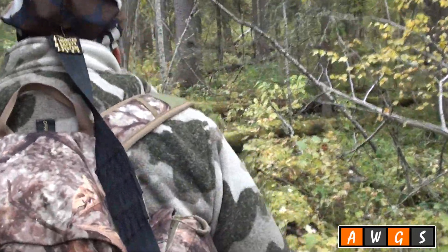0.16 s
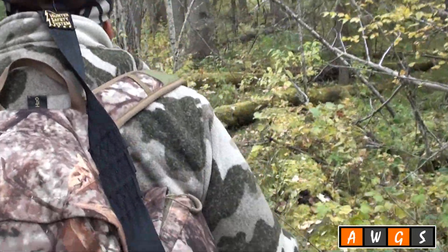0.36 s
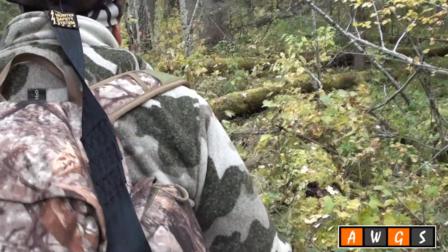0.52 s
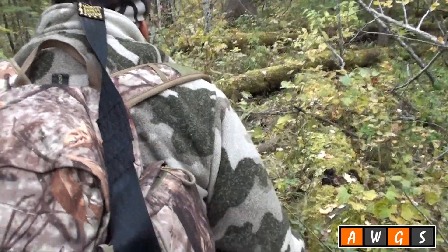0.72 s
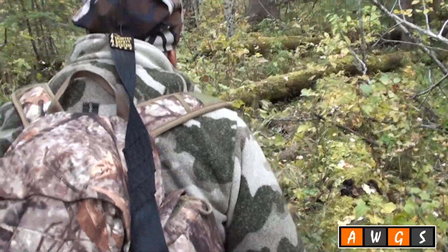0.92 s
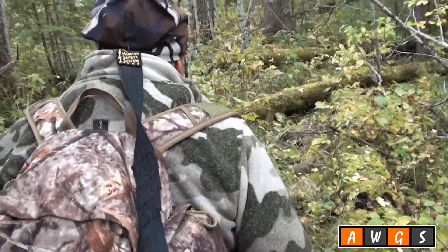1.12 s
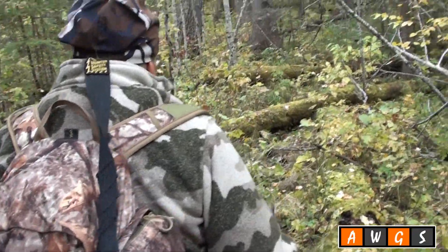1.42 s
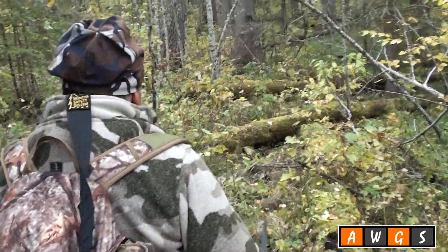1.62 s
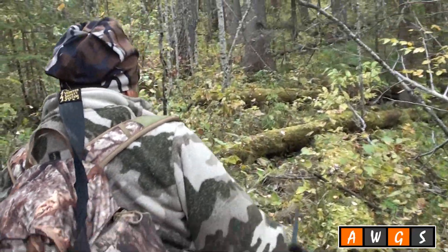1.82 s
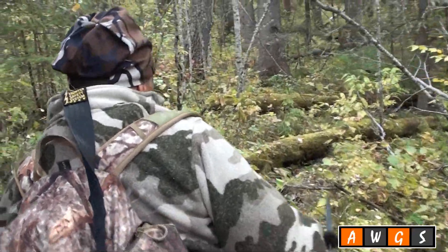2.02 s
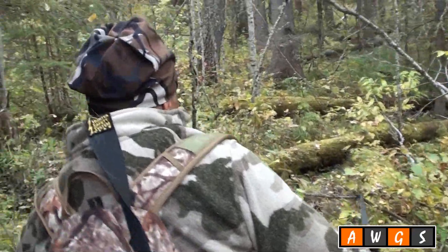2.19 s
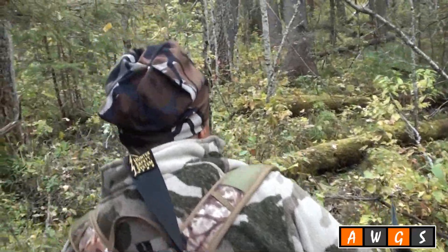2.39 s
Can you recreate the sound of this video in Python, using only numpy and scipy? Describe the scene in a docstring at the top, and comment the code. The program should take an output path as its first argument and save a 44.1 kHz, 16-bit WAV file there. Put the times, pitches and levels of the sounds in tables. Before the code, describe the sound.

Walkers push through dense forest undergrowth: hissing leaves, scraping twigs, rubbing cloth and straps, cracking sticks and soft thuds underfoot. Busiest mid-way, then quieter, with a crisp snap and far knock; close, dry outdoor sound.

```python
"""Forest undergrowth, with walkers pushing through it close to the microphone. Leaves hiss and crackle along
their clothes, twigs scrape and stalks flick the fabric, cloth, strap and pack shell rub: all filtered noise or
random impulses. Sticks crack underfoot and twigs tick high as resonant noise bursts, and one dry twig snaps
close by in brief high modes. Short swinging tones make dull thuds of soil and wood and, at 2.08 s, a distant
wooden knock with its echoes. The trunks answer with a faint noise tail, and a look-ahead limiter catches the
sharpest hits."""
import sys
import numpy as np
from scipy import signal
from scipy.fft import rfft, irfft, next_fast_len
from scipy.io import wavfile
from scipy.ndimage import uniform_filter1d, minimum_filter1d, map_coordinates

SR = 44100
rng = np.random.default_rng(int(sys.argv[2]) if len(sys.argv) > 2 else 0)


def persist_wave(psi):
    """Save psi, clipped to +-1, as 16-bit WAV."""
    counts = np.round(np.clip(psi, -1, 1) * 32767).astype(np.int16)
    wavfile.write(sys.argv[1], SR, np.atleast_2d(counts).T)


N = 112454  # length in samples


def amp(db):
    """Decibels to gain."""
    return 10 ** (np.asarray(db) / 20)


def unit(x):
    """Scale to rms 1."""
    return x / np.sqrt(np.mean(x ** 2) + 1e-20)


def level(rows):
    """Gain for each sample, drawn through rows of seconds and dB."""
    return amp(np.interp(np.arange(N) / SR, *np.transpose(rows)))


def wobble(rate):
    """A smooth random curve with `rate` knots a second."""
    knots = rng.standard_normal(4096)
    return map_coordinates(knots, [np.arange(N) * rate / SR], mode="wrap")


def tone_gain(tone, m):
    """Gain at each bin of an m-point FFT, drawn through rows of Hz and dB on a log frequency axis."""
    hz, db = np.transpose(tone)
    bins = np.fft.rfftfreq(m, 1 / SR)
    return amp(np.interp(np.log(bins + 1), np.log(hz), db))


def colour(x, tone):
    """Minimum-phase filter of unit power: folding the cepstrum makes the response causal."""
    m = 2 * next_fast_len(x.shape[-1])
    cepstrum = irfft(np.log(unit(tone_gain(tone, m))))
    cepstrum[1:m // 2] *= 2
    cepstrum[m // 2 + 1:] = 0
    response = np.exp(rfft(cepstrum))
    return irfft(rfft(x, m) * response, m)[..., :x.shape[-1]]


# How far the stereo side lies under the middle. Each row: frequency in Hz, side gain in dB.
SIDE_TONE = [(60, -20), (200, -21), (600, -14.5), (5500, -19), (10000, -28), (14000, -52)]


def stereo(pair):
    """Left and right from a middle signal and a second one, weakened by frequency into the side."""
    m = next_fast_len(N + 8192)
    middle = pair[0]
    side = irfft(rfft(pair[1], m) * tone_gain(SIDE_TONE, m), m)[:N]
    return np.array([middle + side, middle - side])


def add(track, s, sound):
    """Mix a sound in at s seconds, cut off at the end of the track."""
    i = round(s * SR)
    track[..., i:i + sound.shape[-1]] += sound[..., :max(N - i, 0)]


def grains(rate, spread_db):
    """Two impulse trains with shared random times and log-normal sizes, but separate random signs."""
    # dividing by the root of the rate keeps the power even as the rate changes
    hit = (rng.random(N) < rate / SR) / np.sqrt(np.minimum(rate, SR))
    size = amp(spread_db * np.clip(rng.standard_normal(N), -2.3, 2.3))
    return unit(hit * size * rng.choice([-1, 1], (2, N)))


# Push of the leaves along the clothes. Each row: time in seconds, relative level in dB.
LEAF_PUSH = [(0, -39), (.1, -32.5), (.22, -27.5), (.275, -36), (.38, -26), (.435, -23.5), (.46, -32.5),
             (.57, -24), (.66, -31), (.8, -25.5), (.92, -30.5), (.995, -36.5), (1.03, -22), (1.065, -16),
             (1.17, -17.5), (1.27, -20.5), (1.315, -17), (1.38, -26), (1.47, -28.5), (1.54, -36.5),
             (1.75, -30), (1.8, -35.5), (1.88, -32), (2.0, -31), (2.04, -36), (2.27, -35), (2.31, -38),
             (2.41, -33.5), (2.45, -36.5), (2.55, -36.5)]
# Spectrum of leaves on fabric. Each row: frequency in Hz, relative level in dB.
LEAF_SPECTRUM = [(1000, -29), (3000, -12), (4800, -9.5), (6200, -3), (7400, -1), (8800, -6), (10500, -11.5),
                 (13000, -20), (16000, -24)]
LEAF_DB, CRACKLE_DB = 1, -4
CRACKLE_PER_S, CRACKLE_FLOOR_PER_S = 900, 400  # the first at the mean push, the second always added
CRACKLE_GROWS, CRACKLE_SPREAD_DB = 1.5, 7  # exponent: a harder push stirs more leaves at once


def leaves():
    """Sliding leaves: a fine hiss of tiny slips and crackles that crowd together as the push grows."""
    push = level(LEAF_PUSH)
    crowding = (push / push.mean()) ** CRACKLE_GROWS
    hiss = amp(LEAF_DB) * grains(rate=25000, spread_db=0)
    crackle_rate = CRACKLE_PER_S * crowding + CRACKLE_FLOOR_PER_S
    crackle = amp(CRACKLE_DB) * grains(crackle_rate, CRACKLE_SPREAD_DB)
    catch = unit(amp(0.76 * wobble(44.72) + 1.4 * wobble(260)))  # slow and fast unevenness in dB
    return stereo(colour((hiss + crackle) * catch * push, LEAF_SPECTRUM))


# Rubbing of jacket and pack. Each row: time in seconds, relative level in dB.
CLOTH_RUB = [(0, -35), (.13, -34), (.26, -37.5), (.44, -39), (.56, -35), (.8, -33), (.9, -34.5),
             (.98, -34.5), (1.08, -29.5), (1.21, -30.5), (1.36, -34), (1.44, -37), (1.56, -36.5),
             (1.68, -34), (1.76, -37), (1.84, -41), (2.2, -41.5), (2.55, -41.5)]
# Spectrum of the rubbing. Each row: frequency in Hz, relative level in dB.
CLOTH_SPECTRUM = [(100, -17.5), (250, -4), (500, 0.5), (900, -.5), (1550, -3.5), (1800, 2), (2100, -3),
                  (3200, -6.5), (5000, -11.5), (12000, -26)]
CLOTH_DB = 2


def clothes():
    """Jacket and pack rub with the uneven grain of many small fibre slips."""
    slips = grains(rate=5000, spread_db=2.5)
    rub = unit(slips * amp(1.48 * wobble(60))) * level(CLOTH_RUB)
    return stereo(amp(CLOTH_DB) * colour(rub, CLOTH_SPECTRUM))


# Soft ground and bumping pack. Each row: time in seconds, relative level in dB.
TREAD_LEVEL = [(0.0, -44), (0.03, -38), (0.42, -51), (0.6, -37.5), (0.69, -46.5), (0.99, -43), (1.01, -33),
               (1.04, -47), (1.2, -33.5), (1.25, -43), (1.6, -49), (1.77, -36.5), (1.79, -50), (1.88, -50),
               (1.91, -45), (1.98, -54), (2.45, -49.5), (2.55, -41)]
# Dull spectrum of the tread. Each row: frequency in Hz, relative level in dB.
TREAD_SPECTRUM = [(20, -34), (40, -30), (65, -12), (110, -4.5), (200, 1.5), (300, 0), (600, -25.5),
                  (2000, -55)]
TREAD_DB = -3


def tread():
    """The dull shuffle and thud of soft ground and pack: low noise of uneven strength."""
    noise = rng.standard_normal((2, N))
    shuffle = unit(noise * amp(1.7 * wobble(35.1))) * level(TREAD_LEVEL)
    return stereo(amp(TREAD_DB) * colour(shuffle, TREAD_SPECTRUM))


# A strap sliding over nylon. Each row: time in seconds, relative level in dB.
STRAP_SLIDE = [(0, -32), (.055, -30), (.08, -36), (.17, -38), (.25, -57)]
# Narrow bands of the webbing. Each row: frequency in Hz, relative level in dB.
STRAP_SPECTRUM = [(40, -35), (200, -13), (500, 0), (1500, -20), (2000, -2), (2250, 0.5), (2900, -3),
                  (3600, -21), (9000, -36)]


def strap():
    """Webbing slides over nylon: dense slips of equal size rasp in narrow bands."""
    slips = grains(rate=6000, spread_db=0)
    return stereo(colour(slips * level(STRAP_SLIDE), STRAP_SPECTRUM))


# Hollow rasp of the pack's shell. Each row: time in seconds, relative level in dB.
SHELL_RASP = [(.4, -65), (.52, -34), (.78, -35.5), (.9, -35), (1.0, -40), (1.5, -49), (2.05, -50.5),
              (2.55, -56)]
# Narrow bands of the shell. Each row: frequency in Hz, relative level in dB.
SHELL_SPECTRUM = [(100, -52), (1300, -13), (1650, -0.5), (1790, -0.5), (1950, 1), (2200, -4.5), (3000, -6),
                  (6000, -33)]


def pack_shell():
    """The pack's nylon shell rasps hollowly: slips of uneven size in narrow bands."""
    slips = grains(rate=4700, spread_db=5)
    return stereo(colour(slips * level(SHELL_RASP), SHELL_SPECTRUM))


# Twigs dragged over fabric. Each row: start in seconds, length in seconds, relative level in dB.
TWIG_DRAGS = [(0.116, 0.0048, -28), (0.124, 0.01, -18.5), (0.139, .018, -24), (0.179, .014, -22),
              (0.194, .007, -11.5), (0.208, 0.019, -19), (0.285, .016, -17), (0.317, 0.013, -15.5),
              (0.876, 0.0093, -23.5), (1.0127, 0.0015, -12.5), (1.2012, 0.0014, 6), (1.28, 0.0018, 0.5),
              (1.972, 0.0089, -30), (2.34, 0.01, -25.5), (2.397, 0.011, -29)]
# Spectrum of twig or stalk on fabric, for scrapes and flicks. Each row: frequency in Hz, relative level in dB.
FABRIC_SPECTRUM = [(40, -43), (200, -21), (700, -17.5), (2000, -14), (4000, -10), (6000, -2.5), (7400, 3),
                   (9000, -4.5), (12000, -11.5), (16000, -26)]
SCRAPE_DB = 0.5


def scrapes(attack_s=0.0017, release_s=0.0024, rough_db=1.5):
    """A twig drags over the weave in a short burst of dense slips."""
    force, t = np.zeros(N), np.arange(SR // 10) / SR
    for s, length, db in TWIG_DRAGS:
        attack = np.minimum(t / attack_s, 1)
        release = np.exp(-np.maximum(t - length, 0) / release_s)
        add(force, s, amp(db + SCRAPE_DB) * attack * release)
    slips = unit(grains(rate=12000, spread_db=1) * amp(rough_db * wobble(600)))
    return stereo(colour(force * slips, FABRIC_SPECTRUM))


# Leaf stalks flicking the clothes. Each row: start in seconds, relative level in dB.
STALK_FLICKS = [(.1268, 2), (.1705, -10), (0.3, -2), (.347, -5), (0.4088, -1.5), (.4178, 3), (.4732, -2),
                (.5555, -11), (1.1299, 7.5), (1.182, 4), (1.2035, 19), (1.2828, 22.5), (1.442, -12),
                (1.626, -5), (1.652, -14), (1.7025, -10), (1.708, -13), (1.768, -2), (2.09, -9.5)]
FLICK_T60 = 0.004  # seconds to fall 60 dB


def flicks(gain_db=-6):
    """A stalk springs back and ticks on the fabric: a tiny dying burst of noise."""
    force, t = np.zeros(N), np.arange(SR // 20) / SR
    for s, db in STALK_FLICKS:
        add(force, s, amp(db + gain_db - 60 * t / FLICK_T60))
    return stereo(colour(force * rng.choice([-1, 1], (2, N)), FABRIC_SPECTRUM))


# Sticks breaking underfoot, and in the last two rows high, sharp twig ticks. Each row: start in seconds, peak
# of the middle in dB, pitch in Hz, sharpness Q.
STICK_CRACKS = [(.155, -15.5, 1000, 1.5), (.196, -18, 770, 1.6), (.635, -20, 1860, 1.4),
                (.874, -18.5, 493, 1.9), (1.095, -5.5, 1180, 1.4), (1.167, -13.5, 1370, 2.6),
                (1.19, -13, 690, 1.2), (1.2715, -11, 1900, 2.6), (1.338, -10, 2400, 1),
                (1.366, -14.5, 950, 1.2), (1.477, -23.5, 1770, 2.8), (1.626, -11.5, 1190, 0.89),
                (1.708, -8.5, 2500, 0.52), (1.753, -20.5, 890, 2.4), (1.768, -16.5, 980, 1.5),
                (1.9056, -7.5, 2010, 0.42), (2.339, -22, 1750, 1.7), (2.4005, -20.5, 710, 1.5),
                (2.489, -16, 3420, 9), (2.529, -23.5, 3300, 7)]
CRACK_T60 = 0.022  # seconds for the tearing to fall 60 dB


def cracks():
    """Fibres tear in a quick dying burst through the stick's resonance."""
    out, t = np.zeros((2, N)), np.arange(SR // 10) / SR
    for s, db, hz, q in STICK_CRACKS:
        tear = rng.standard_normal((2, len(t))) * amp(-60 * t / CRACK_T60)
        ring = signal.lfilter(*signal.iirpeak(hz, q, SR), tear)
        add(out, s, amp(db) * ring / np.abs(ring[0]).max())
    return stereo(out)


# Knocks: dull thuds of soil and wood, and at 2.08 s a distant wooden knock with its echoes as rows of their own.
# Each row: start in seconds, peak in dB, pitch in Hz.
KNOCKS = [(1.002, -25.5, 263), (1.195, -28.5, 170), (1.705, -40, 100), (1.709, -30, 272),
          (1.753, -25.5, 210), (1.757, -37.5, 84), (1.908, -28.5, 264), (2.075, -16, 500),
          (2.0905, -31, 524), (2.096, -24, 493), (2.109, -24.5, 634), (2.139, -30.5, 500),
          (2.289, -28, 386), (2.4, -26, 560), (2.535, -31, 250)]
KNOCK_CYCLES, KNOCK_RISE_CYCLES = 7.4, 1  # cycles to fall 60 dB, and cycles of rise


def knocks():
    """A soft blow sets wood or soil swinging for a few cycles."""
    out, t = np.zeros(N), np.arange(SR // 5) / SR
    for s, db, hz in KNOCKS:
        cycles = hz * t
        rise = 1 - np.exp(-(cycles / KNOCK_RISE_CYCLES) ** 2)
        decay = amp(-60 * cycles / KNOCK_CYCLES)
        swing = -np.sin(2 * np.pi * cycles) * decay * rise
        add(out, s, amp(db) * swing / np.abs(swing).max())
    return out


# Modes of the dry twig. Each row: frequency in Hz, relative level in dB, time to fall 60 dB in seconds.
TWIG_MODES = [(5490, -0.5, 0.0052), (6800, -4.5, .011), (7880, -4, 0.013), (9170, -0.5, 0.0082),
              (11440, -9, .007)]
SNAP_S, SNAP_DB = 1.9052, -7.5  # start, and gain over all modes


def snap(rise_s=0.00043, tear_s=0.00163, rough=0.23):
    """The dry twig tears through for an instant, then its noisy modes ring very briefly."""
    out, t = np.zeros(N), np.arange(SR // 10) / SR
    after = np.maximum(t - tear_s, 0)  # the decay waits until the tear is through
    ring = np.zeros(len(t))
    for hz, db, t60 in TWIG_MODES:
        tone = np.sin(2 * np.pi * (hz * t + rng.random()))
        noise = rough * rng.standard_normal(len(t))
        ring += amp(db - 60 * after / t60) * (tone + noise)
    add(out, SNAP_S, amp(SNAP_DB) * ring * (1 - np.exp(-t / rise_s)))
    return out


# Spectrum of the trunks' answer. Each row: frequency in Hz, relative level in dB.
FOREST_SPECTRUM = [(100, -5), (500, 0), (2000, -3), (6000, 0.5), (9000, -3), (14000, -17)]
FOREST_DB, FOREST_T60 = -21.5, 0.22  # gain of the answer, seconds to fall 60 dB


def forest(sources):
    """Scatter from the trunks as a decaying noise tail; foliage swallows its top."""
    t = np.arange(SR // 2) / SR
    tail = rng.standard_normal((2, len(t))) * amp(-60 * t / FOREST_T60)
    tail = colour(tail, FOREST_SPECTRUM)
    tail = tail / np.linalg.norm(tail[0])
    return signal.fftconvolve(sources, tail, axes=1)[:, :N]


def scene():
    """The walkers' rubbing, twigs and tread, the knocks, and the forest's faint answer."""
    rubbing = leaves() + clothes() + strap() + pack_shell()
    twigs = scrapes() + flicks() + cracks() + snap()
    sources = rubbing + twigs + tread() + knocks()
    return sources + amp(FOREST_DB) * forest(sources)


LOOKAHEAD_S, CEILING, TOP_HZ = 0.004, 1, 16000  # limiter window and peak ceiling, upper band limit


def record(dry, low_cut_hz=45):
    """A look-ahead limiter, then the microphone's low cut and the band limit."""
    size = 2 * int(LOOKAHEAD_S * SR / 4) + 1
    needed = np.minimum(1, CEILING / (np.abs(dry).max(axis=0) + 1e-9))
    ahead = minimum_filter1d(needed, 2 * size, origin=-(size // 2))  # leans towards coming peaks
    limited = dry * uniform_filter1d(ahead, size)
    m = next_fast_len(N + SR // 2)
    hz = np.fft.rfftfreq(m, 1 / SR)
    low_cut = 1j * hz / (1j * hz + low_cut_hz)
    return irfft(rfft(limited, m) * low_cut * (hz < TOP_HZ), m)[:, :N]


dry = scene()
out = record(dry)
persist_wave(out)
```